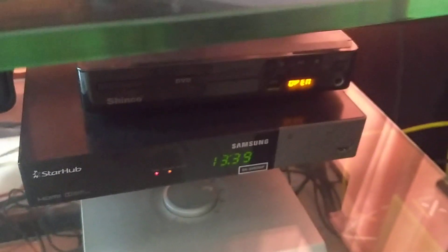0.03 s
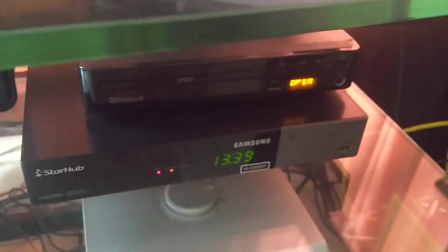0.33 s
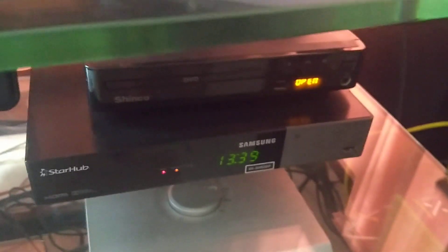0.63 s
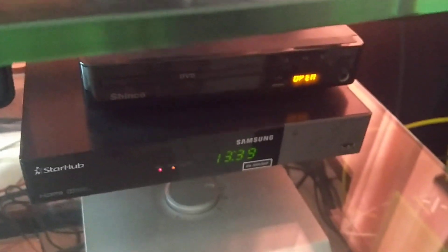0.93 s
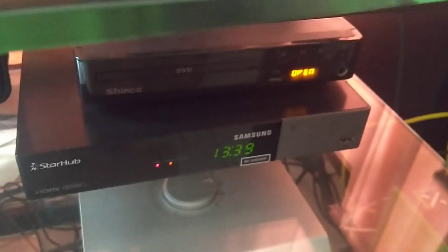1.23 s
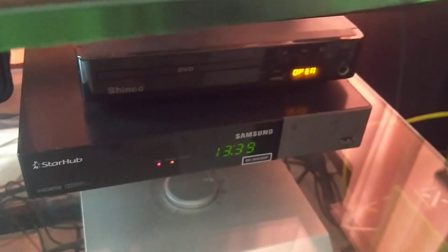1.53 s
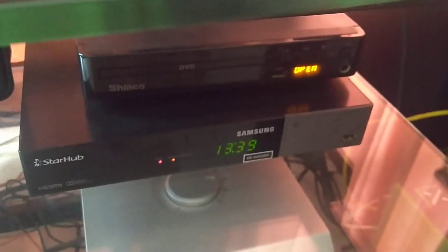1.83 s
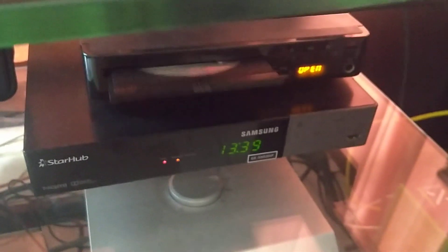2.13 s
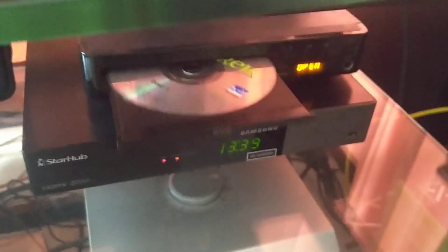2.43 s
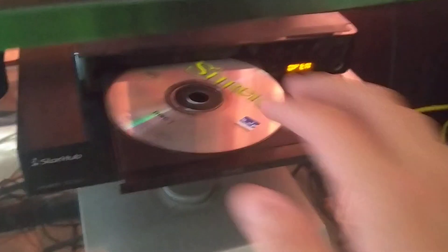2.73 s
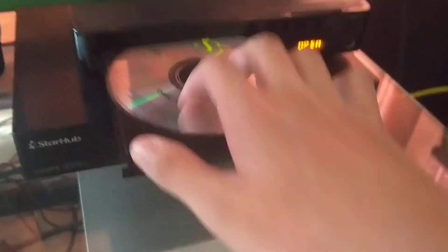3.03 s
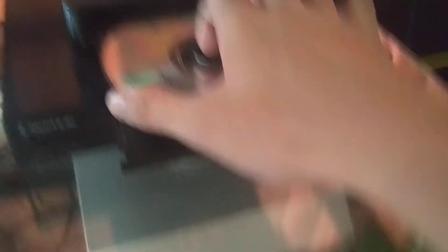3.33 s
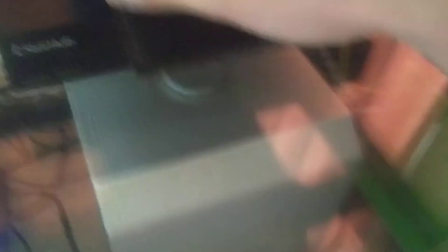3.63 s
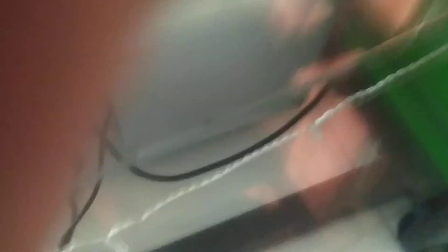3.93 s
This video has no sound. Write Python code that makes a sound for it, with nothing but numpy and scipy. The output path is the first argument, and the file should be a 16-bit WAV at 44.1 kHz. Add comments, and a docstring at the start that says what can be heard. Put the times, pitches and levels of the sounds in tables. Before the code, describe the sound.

A disc player opens in a quiet room: a faint whir, a rattling clunk, then a small motor slides the tray out. Fingers tap the disc, it knocks against the plastic tray, and something scrapes loudly near the microphone.

```python
"""A disc player opens

In a quiet room the drive brakes and whirrs down, the mechanism unlatches with a rattling clunk, and a
small geared motor runs the tray out. Fingers tap the disc and knock it against the plastic tray: each
impact excites a broadband crack and the damped modes of the part. At the end something scrapes loudly
and very close, as stick-slip friction keeps its resonances sounding."""
import sys
import numpy as np
from scipy import signal
from scipy.fft import rfft, irfft
from scipy.io import wavfile
from scipy.ndimage import uniform_filter1d

SR = 44100
rng = np.random.default_rng(int(sys.argv[2]) if len(sys.argv) > 2 else 0)


def persist_wave(psi):
    """Save psi, clipped to +-1, as 16-bit WAV."""
    counts = np.round(np.clip(psi, -1, 1) * 32767).astype(np.int16)
    wavfile.write(sys.argv[1], SR, np.atleast_2d(counts).T)


N = 176400
T = np.arange(N) / SR


def amp(db):
    """Decibels to amplitude ratio."""
    return 10 ** (np.asarray(db) / 20)


def unit(x):
    """Normalisation to rms 1."""
    return x / np.sqrt(np.mean(x ** 2) + 1e-20)


def decay(t, t60):
    """Exponential damping: 60 dB down after t60 seconds."""
    return np.exp(-np.log(1000) * t / t60)


def colour(x, spectrum):
    """Spectral shaping by a curve of relative levels, at rms 1."""
    hz, db = np.transpose(spectrum)
    f = np.fft.rfftfreq(len(x), 1 / SR)
    gain = amp(np.interp(np.log(f + 1), np.log(hz), db))
    return unit(irfft(rfft(x) * gain, len(x)))


def noise(spectrum, n=N):
    """Coloured Gaussian noise of rms 1."""
    return colour(rng.standard_normal(n), spectrum)


def envelope(curve, column=1):
    """Amplitude along a level curve, silent before it and decaying after it."""
    times, db = np.transpose(curve)[[0, column]]
    release = np.exp(-np.maximum(T - times[-1], 0) * 20)
    return amp(np.interp(T, times, db)) * (T >= times[0]) * release


def drift(hz):
    """Random fluctuation of rms 1, band-limited below hz."""
    return unit(irfft(rfft(rng.standard_normal(N)) * (np.fft.rfftfreq(N, 1 / SR) < hz), N))


def slips(per_s, spread_db):
    """Shot noise: tiny frictional slips of uneven size at random times."""
    impulses = rng.standard_normal(N) * (rng.random(N) < per_s / SR)
    return unit(impulses * amp(spread_db * np.minimum(rng.exponential(1, N), 4)))


def reflect(x, tail, db):
    """Superposition of the direct sound and its convolution with a tail of reflections."""
    return x + amp(db) * signal.fftconvolve(x, tail / np.linalg.norm(tail))[:N]


def room(x, t60=0.36):
    """Reverberation: furniture and walls return a short, dull tail."""
    t = np.arange(SR // 2) / SR
    diffuse = noise([(200, 2.5), (2500, -8.0), (5000, -7.5), (15000, -8.5)], len(t))
    return reflect(x, diffuse * decay(t, t60) * (t > .004), db=-14)


def scatter(x, t60=0.042):
    """Early reflections in the case and off the shelves blur each tick."""
    t = np.arange(2048) / SR
    return reflect(x, rng.standard_normal(len(t)) * decay(t, t60), db=3)


# Spectrum of the room noise: f/Hz, level/dB
ROOM_SPECTRUM = [(30, -49), (62, -28), (92, -10), (120, -5), (148, -4), (180, -6), (250, -9), (310, -17.5),
                 (420, -10), (540, -18), (720, -19), (1250, -19), (1800, -23.5), (3200, -29.5), (4100, -38),
                 (6500, -38), (7700, -35), (8400, -28.5), (10000, -40), (12500, -44.5), (15600, -32.5)]
def room_noise():
    """Stationary noise, strongest in the bass."""
    return amp(-54.5) * noise(ROOM_SPECTRUM)


def hum(hz=148.4, waver_hz=9, swell_db=2.5):
    """Equipment hum: a low tone under random amplitude and frequency modulation."""
    gain = amp(-62 + swell_db * drift(9.2))
    cycles = np.cumsum(hz + waver_hz * drift(20)) / SR
    return gain * unit(np.sin(2 * np.pi * cycles))


# Envelope of the whirr: t/s, level/dB
WHIRR_LEVEL = [(.2, -62.5), (.6, -66), (1.0, -71.5), (1.2, -60), (1.42, -64.5), (1.55, -77)]
# Its spectrum: f/Hz, level/dB
WHIRR_SPECTRUM = [(200, 1.5), (850, -2), (1250, 3), (1800, -3.5), (2800, -7.5), (5000, -14.5),
                  (8500, -11.5), (9800, -15), (10600, -13), (12000, -22), (15500, -9)]
def whirr():
    """Amplitude-modulated noise: the faint sound of the disc running down."""
    return envelope(WHIRR_LEVEL) * noise(WHIRR_SPECTRUM)


def slide(spectrum, start_s, db, rise_s, t60, tail_db, tail_t60):
    """Sliding friction: dense slips swell and die away, with a duller tail of noise."""
    t = np.maximum(T - start_s, 0)
    fading = np.maximum(t - rise_s, 0)
    dull = unit(signal.sosfilt(signal.butter(2, 3500, fs=SR, output="sos"), noise(spectrum)))
    tail = amp(tail_db) * decay(fading, tail_t60) * dull
    rub = decay(fading, t60) * colour(slips(16000, 0.52), spectrum)
    return amp(db) * np.minimum(t / rise_s, 1) * (rub + tail)


# Spectrum of the brake: f/Hz, level/dB
BRAKE_SPECTRUM = [(100, 4), (150, 20), (260, 5.5), (600, -5), (1500, -1), (3300, 2.5), (4200, -2.5),
                  (7000, -2.5), (8500, -1), (11000, -13), (15500, -3.5)]
def brake():
    """Friction brakes the disc with a short hiss."""
    return slide(BRAKE_SPECTRUM, .082, db=-48.5, rise_s=0.011, t60=0.38, tail_db=-2.5, tail_t60=0.68)


# Spectrum of the cam: f/Hz, level/dB
CAM_SPECTRUM = [(88, -52), (150, -7), (373, 1), (656, -3), (1150, -13), (2310, -7.5), (4140, -21.5),
                (8660, -18.5), (12000, -31), (15500, -15)]
def cam():
    """Friction noise of the drive's sliding cam."""
    return slide(CAM_SPECTRUM, 1.922, db=-44, rise_s=0.029, t60=0.37, tail_db=-1.5, tail_t60=0.4)


# Spectrum of the rail: f/Hz, level/dB
RAIL_SPECTRUM = [(150, -24), (400, 3), (750, 4), (1300, -7), (2100, -3.5), (2900, -15), (5000, -32),
                 (7500, -20), (9500, -23), (15000, -44)]
def rail():
    """Friction of the tray near the end of its travel."""
    return slide(RAIL_SPECTRUM, 2.668, db=-46.5, rise_s=0.022, t60=0.36, tail_db=-23, tail_t60=.4)


# Envelope of the tray motor: t/s, level/dB
MOTOR_LEVEL = [(1.9, -53), (2.0, -50.5), (2.16, -50), (2.26, -49), (2.31, -52), (2.39, -51.5), (2.49, -54),
               (2.54, -51.5), (2.63, -51), (2.78, -52), (2.85, -56.5), (2.97, -66)]
# Its spectrum: f/Hz, level/dB
MOTOR_SPECTRUM = [(70, -27), (110, 2), (150, 9), (260, -3.5), (360, 1.5), (550, -3), (830, -11.5),
                  (1100, -3), (1750, -8.5), (2500, -17.5), (4200, -26), (6500, -29.5), (7500, -24),
                  (9300, -26), (11500, -37), (15500, -27)]
def motor(mesh_hz=119.4, waver=.04, tooth_spread_db=3, uneven_db=1.0):
    """Structure-borne sound: meshing teeth tick through the case as the tray rubs along its rails."""
    tooth_count = np.cumsum(mesh_hz * (1 + waver * drift(12))) / SR
    ticks = np.diff(np.floor(tooth_count), prepend=0) * amp(tooth_spread_db * rng.standard_normal(N))
    force = (amp(-10) * unit(ticks) + slips(3500, 2.2)) * amp(uneven_db * drift(27))
    force = signal.sosfilt(signal.butter(2, 130, "high", fs=SR, output="sos"), force)
    return envelope(MOTOR_LEVEL) * colour(scatter(force), MOTOR_SPECTRUM)


# Envelope of the rustle: t/s, level/dB
RUSTLE_LEVEL = [(2.8, -58), (3.1, -57.5), (3.16, -50), (3.24, -57), (3.35, -58.5), (3.54, -53),
                (3.575, -43), (3.62, -46.5), (3.68, -51), (3.745, -54.5), (3.82, -56.5), (3.86, -46),
                (3.91, -63)]
# Its spectrum: f/Hz, level/dB
RUSTLE_SPECTRUM = [(47, -37), (80, -10), (145, 5), (332, -2.5), (971, -12), (1240, -14.5), (2400, -15),
                   (4120, -26), (12600, -32.5), (15000, -26)]
def rustle():
    """Small frictional slips merge into a rustle as the hand lifts the disc."""
    return envelope(RUSTLE_LEVEL) * colour(scatter(slips(2500, 2.3)), RUSTLE_SPECTRUM)


def ring(t, modes, tilt_db=0, pivot_hz=1350, detune=0.013):
    """Free vibration of damped modes; a hard touch (positive tilt) favours those above the pivot."""
    out = np.zeros(len(t))
    for hz, db, t60 in modes:
        gain = amp(db + tilt_db * np.clip(np.log2(hz / pivot_hz), -.5, .5))
        shifted_hz = hz * (1 + detune * rng.standard_normal())  # each blow lands on another spot
        out += gain * decay(t, t60) * np.sin(2 * np.pi * (shifted_hz * t + rng.random()))
    return out


def impacts(blows, modes, spectrum, gain_db, ring_db, bass_db, treble_db, rise_s, band_t60s):
    """Impact excitation: ringing modes plus a crack that decays in bass, middle and treble bands."""
    out, t = np.zeros(N), np.arange(4096) / SR
    f = np.fft.rfftfreq(len(t), 1 / SR)
    low = 1 / (1 + (f / 650) ** 4)
    high = 1 - 1 / (1 + (f / 3800) ** 8)
    bands = (low, 1 - low - high, high)
    bass_rise = np.minimum(t / 0.0039, 1)  # the panels take a moment to move
    treble_rise = np.sin(np.pi / 2 * np.minimum(t / 0.0045, 1)) ** 2
    for start_s, db, bass, treble, *tilt in blows:
        burst = rfft(colour(rng.choice([-1., 1.], len(t)), spectrum))
        gains = (amp(bass + bass_db) * bass_rise, 1, amp(treble + treble_db) * treble_rise)
        crack = sum(unit(irfft(burst * band)) * gain * decay(t, t60)
                    for band, gain, t60 in zip(bands, gains, band_t60s))
        attack = amp(db + gain_db) * np.minimum(t / rise_s, 1)
        blow = attack * (crack + amp(ring_db) * ring(t, modes, *tilt))
        span = out[round(start_s * SR):][:len(t)]
        span += blow[:len(span)]
    return out


# Blows on the case: t/s, relative level/dB, bass/dB, treble/dB
CASE_BLOWS = [(2.0715, -35, -13, -2.5), (2.0795, -38, -14, -1), (2.087, -32, -24, -3.5),
              (2.1065, -34.5, -18, -4), (2.129, -29.5, -10, -8), (2.142, -31.5, -11, -10),
              (2.147, -28, -8.5, -0.5), (2.158, -31.5, -3, -8), (2.1695, -33, -3.5, -6.5),
              (2.366, -36.5, -14, -37), (2.519, -36.5, -12, -14), (2.672, -40.5, -17, -26)]
# Modes of the case: f/Hz, level/dB, T60/s
CASE_MODES = [(378, 0, 0.072), (607, -3, 0.11), (685, -15, 0.12), (1490, 2, .055), (1860, -4, 0.048),
              (3190, -3.5, 0.03), (4760, -10, .03), (6700, -17, 0.022)]
# Spectrum of its crack: f/Hz, level/dB
CASE_SPECTRUM = [(60, -30), (110, 4), (220, -9), (370, -15), (470, -4), (640, 4), (790, -9), (1100, -4),
                 (1600, 1), (2200, -14.5), (3200, -13.5), (6000, -26), (8400, -20), (11500, -35.5),
                 (15500, -27)]
def case_clunks():
    """Impacts excite the case as the mechanism releases the disc and the tray knocks in its rails."""
    return impacts(CASE_BLOWS, CASE_MODES, CASE_SPECTRUM, gain_db=-8, ring_db=-6,
                   bass_db=0, treble_db=4, rise_s=0.0022, band_t60s=(0.14, 0.076, 0.042))


# Blows on the disc: t/s, relative level/dB, bass/dB, treble/dB, modal tilt/(dB per octave)
DISC_BLOWS = [(3.141, -46.5, -11, -3, -5), (3.167, -38.5, -4, -14, 1), (3.422, -43, -12, -18, 1),
              (3.521, -43.5, -18, -24, 13), (3.56, -35.5, -6, -29, -1), (3.582, -19, -26, -7, -10.5),
              (3.5905, -24, -22, -12, 15.5), (3.598, -31.5, -7, -22, 11), (3.6325, -27.5, -14, -6.5, 9),
              (3.671, -39, -8, -25, -13), (3.701, -36.5, -3, -11, -3)]
# Modes of the disc: f/Hz, level/dB, T60/s
DISC_MODES = [(977, 6.5, 0.032), (1310, 5.5, 0.017), (1547, 0, 0.037), (1823, 1.5, 0.033),
              (2570, -11.5, 0.046), (6340, -11, 0.026), (6970, -15, 0.023), (8470, -14, 0.035)]
# Spectrum of its crack: f/Hz, level/dB
DISC_SPECTRUM = [(59, -45), (100, -3), (228, -9), (601, -1.5), (727, -5), (977, -5), (1210, -2.5),
                 (1840, -9.5), (3250, -19), (8770, -9.5), (11300, -30), (15500, -22)]
def disc_taps():
    """Finger impacts excite the quickly damped modes of the disc."""
    return impacts(DISC_BLOWS, DISC_MODES, DISC_SPECTRUM, gain_db=-6.5, ring_db=-1,
                   bass_db=6.5, treble_db=4.5, rise_s=0.0034, band_t60s=(0.083, 0.043, 0.043))


# Blows on the tray: t/s, relative level/dB, bass/dB, treble/dB
TRAY_BLOWS = [(3.764, -31, -2, 1.5), (3.78, -31, -18, 0), (3.792, -17.5, -27, -6.5), (3.798, -20, -18, -22),
              (3.892, -36, -4.5, -2.5)]
# Modes of the tray: f/Hz, level/dB, T60/s
TRAY_MODES = [(641, -7, 0.045), (1257, -3, 0.11), (1865, -1, 0.08), (2840, -18, 0.12), (7730, -11, 0.024),
              (8650, -8, 0.031)]
# Spectrum of its crack: f/Hz, level/dB
TRAY_SPECTRUM = [(59, -49), (100, -27), (420, -25), (589, -9.5), (758, -21), (1310, -2), (1690, -13),
                 (3050, -13), (4460, -26), (8580, -23.5), (12000, -38), (15500, -25.5)]
def tray_knocks():
    """Sharp impacts of the disc excite the modes of the plastic tray."""
    return impacts(TRAY_BLOWS, TRAY_MODES, TRAY_SPECTRUM, gain_db=-8, ring_db=-3.5,
                   bass_db=7, treble_db=1.5, rise_s=0.00086, band_t60s=(0.091, 0.049, 0.049))


def friction_tones(modes, jitter, jitter_hz, bend=1, flutter_db=4):
    """Friction-sustained resonances, each fluctuating in amplitude and frequency."""
    out = np.zeros(N)
    for hz, db in modes:
        gain = amp(db + flutter_db * drift(jitter_hz))
        cycles = hz * np.cumsum(bend + jitter * drift(jitter_hz)) / SR
        out += gain * np.sin(2 * np.pi * cycles)
    return unit(out)


# Envelopes of the scrape: t/s, level/dB of squeal with grit, of body, of rumble
SCRAPE_LEVELS = [(3.91, -69, -94, -66), (3.926, -34, -37, -50), (3.937, -28.5, -36, -45),
                 (3.948, -32.5, -29.5, -50), (3.956, -30, -25, -28.5), (3.972, -29.5, -21.5, -27),
                 (3.985, -31, -30, -27.5), (4.0, -26.5, -31, -26)]
# Resonances of the squeal: f/Hz, level/dB
SQUEAL_MODES = [(1255, 2), (2790, 4), (3620, -10), (4170, -0.5), (4320, -5), (5650, -8), (5960, -7),
                (6120, -1.5), (6960, -6), (7670, -3), (8400, -6), (8890, -4)]
# Resonances of the hollow body: f/Hz, level/dB
BODY_MODES = [(598, -8), (770, 2.5), (870, -2), (1070, -1.5), (1710, -12)]
# Spectrum of the grit: f/Hz, level/dB
GRIT_SPECTRUM = [(100, -16), (500, -3), (1450, 0.5), (1850, -2), (2250, -6.5), (3000, -1.5), (4300, -7.5),
                 (5100, -9), (6000, -12), (8800, -7.5), (11000, -15), (15500, -15.5)]
# Spectrum of the rumble: f/Hz, level/dB
RUMBLE_SPECTRUM = [(65, -38), (120, -5.5), (200, 4.5), (270, 9.5), (340, -4.5), (450, 3), (700, -18),
                   (1500, -40)]
def scrape(sag_per_s=.25):
    """Stick-slip friction: as pressure grows, a thin squeal sinks and a hollow body and rumble join."""
    centre_s = np.mean([row[0] for row in SCRAPE_LEVELS])
    bend = 1 - sag_per_s * np.clip(T - centre_s, -1, 1)
    squeal = friction_tones(SQUEAL_MODES, jitter=.017, jitter_hz=260.5, bend=bend)
    grit = colour(slips(13000, 0.71), GRIT_SPECTRUM)
    body = friction_tones(BODY_MODES, jitter=0.0256, jitter_hz=90)
    rumble = noise(RUMBLE_SPECTRUM)
    rumble /= np.sqrt(abs(uniform_filter1d(rumble ** 2, size=700)) + 1e-9)  # a firm push evens it out
    layers = (amp(-1) * squeal + amp(-3) * grit, body, rumble)
    return sum(envelope(SCRAPE_LEVELS, column) * layer for column, layer in enumerate(layers, 1))


def scene():
    """Superposition of player, hand and background; only the impacts reverberate in the room."""
    knocks = room(case_clunks() + disc_taps() + tray_knocks())
    rubs = brake() + cam() + rustle() + rail()
    background = whirr() + room_noise() + hum()
    return (background + rubs + motor() + knocks + scrape())[None]


def record(dry, low_hz=78, high_hz=15950):
    """Band limiting by a small microphone: no deep bass and a steep treble edge."""
    thin = signal.sosfilt(signal.butter(6, low_hz, "high", fs=SR, output="sos"), dry)
    lowpass = signal.firwin(511, high_hz, window=("kaiser", 9), fs=SR)
    return signal.oaconvolve(thin, lowpass[None], "same")


dry = scene()
out = record(dry)
persist_wave(out)
```